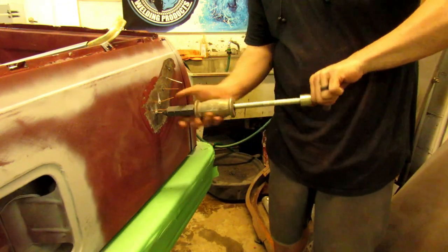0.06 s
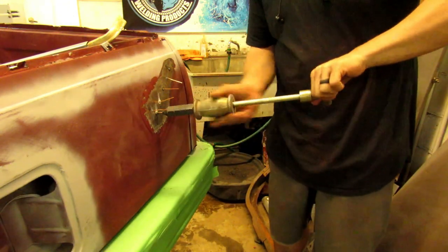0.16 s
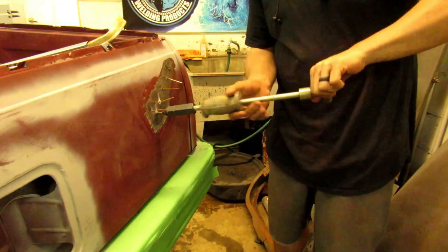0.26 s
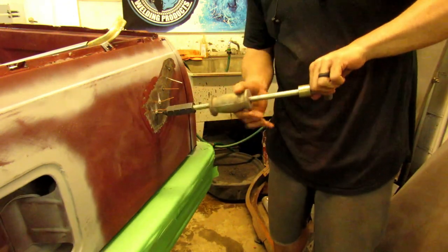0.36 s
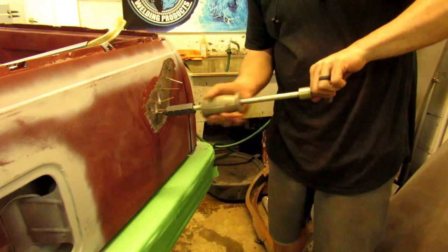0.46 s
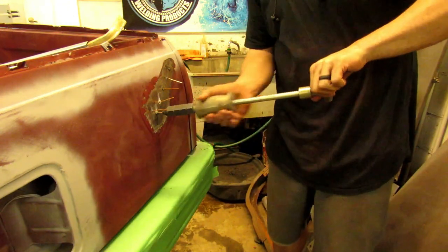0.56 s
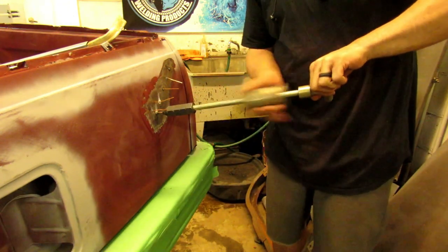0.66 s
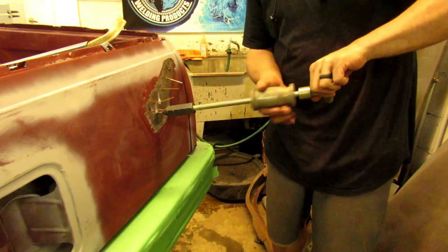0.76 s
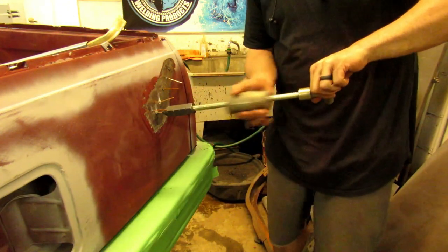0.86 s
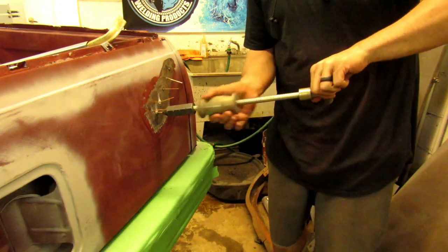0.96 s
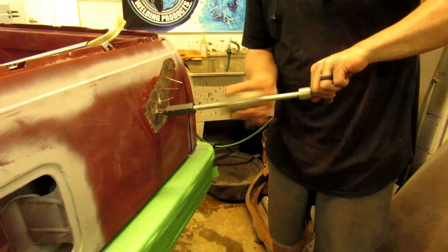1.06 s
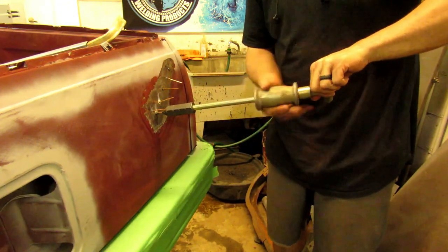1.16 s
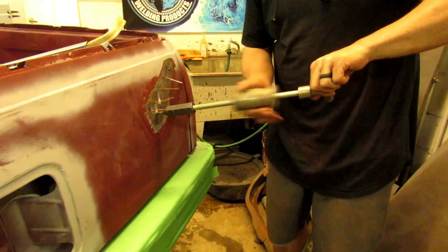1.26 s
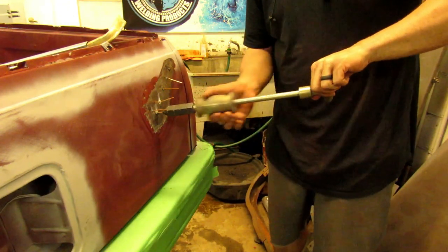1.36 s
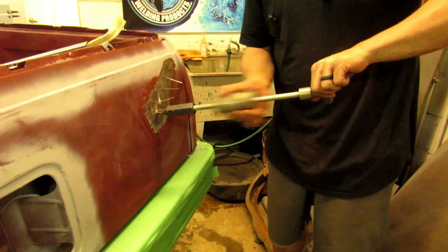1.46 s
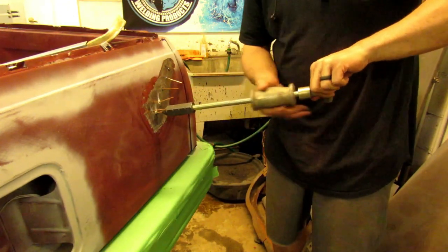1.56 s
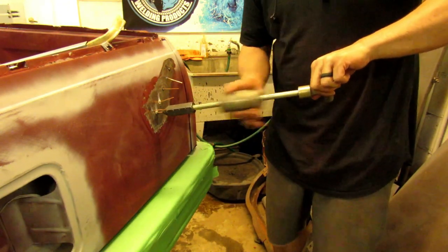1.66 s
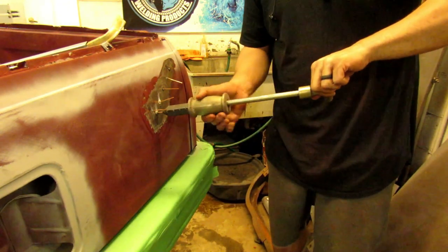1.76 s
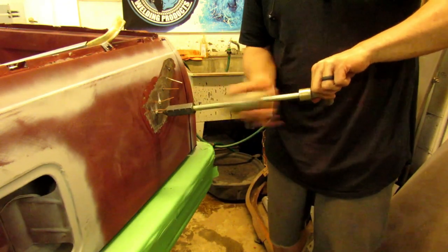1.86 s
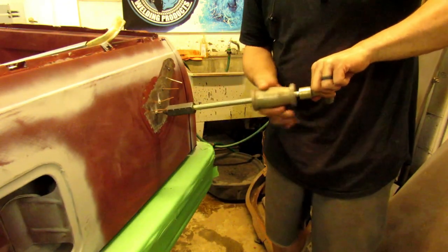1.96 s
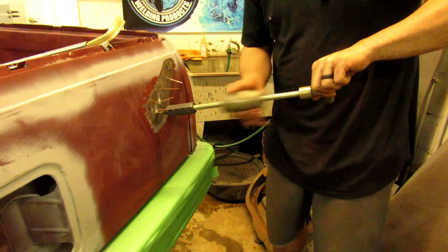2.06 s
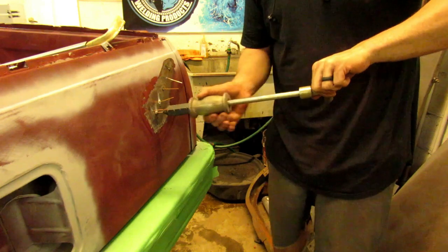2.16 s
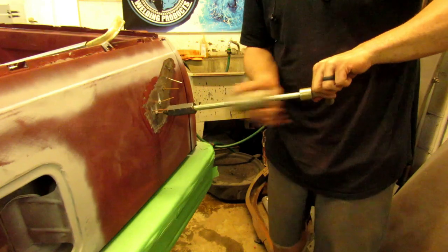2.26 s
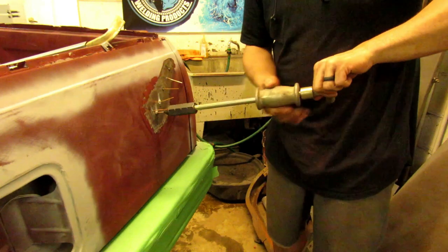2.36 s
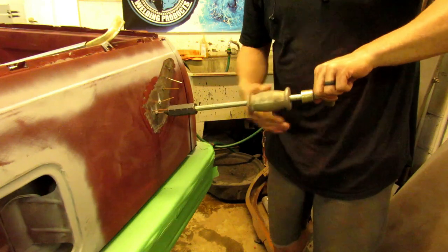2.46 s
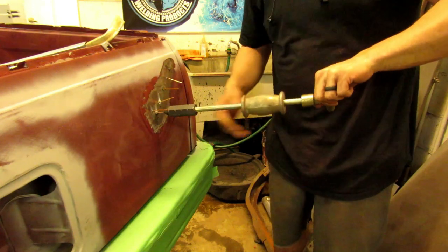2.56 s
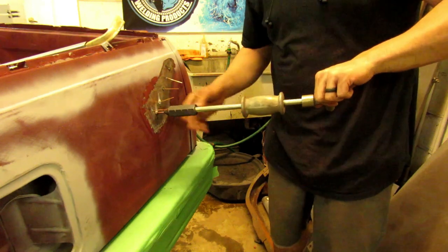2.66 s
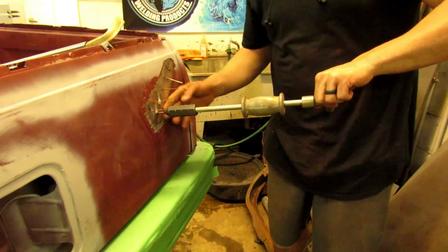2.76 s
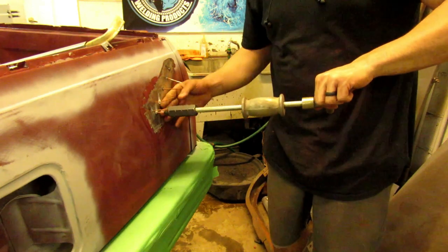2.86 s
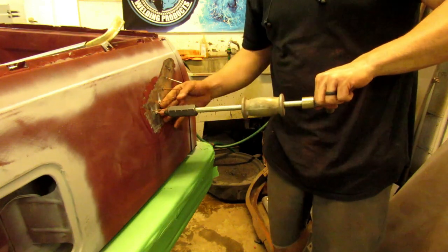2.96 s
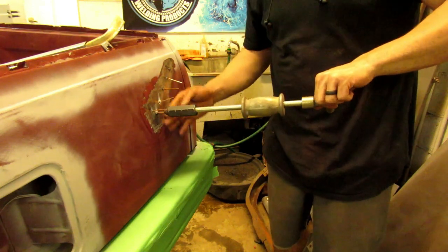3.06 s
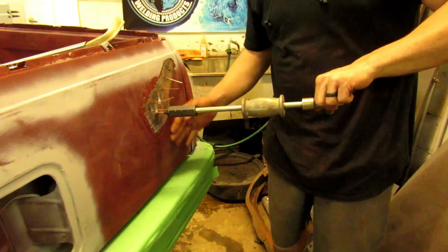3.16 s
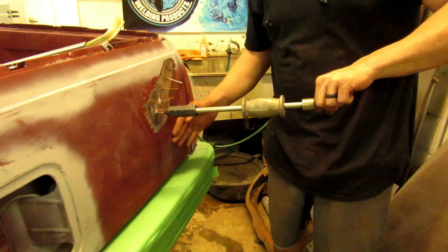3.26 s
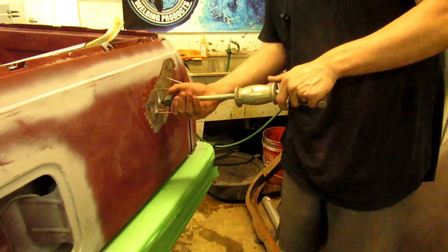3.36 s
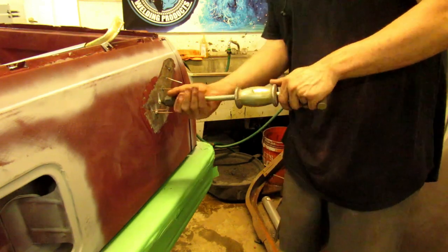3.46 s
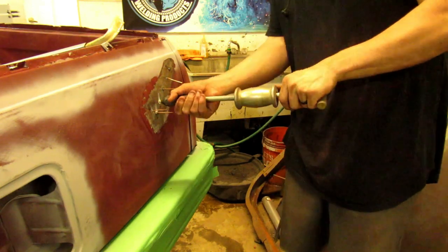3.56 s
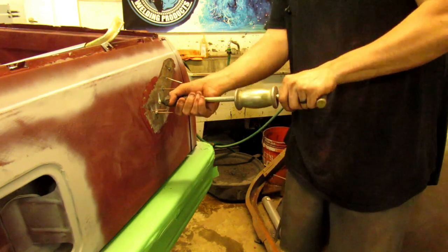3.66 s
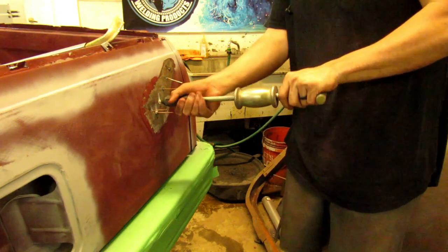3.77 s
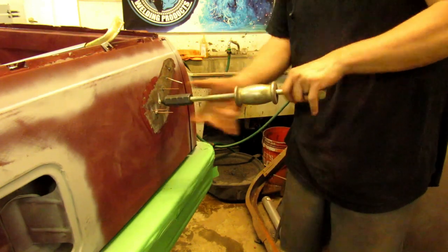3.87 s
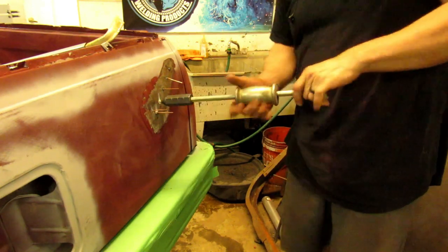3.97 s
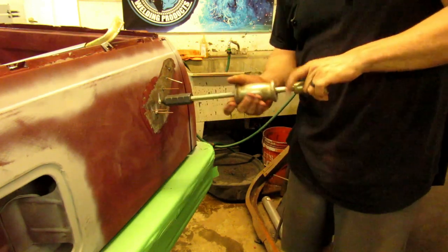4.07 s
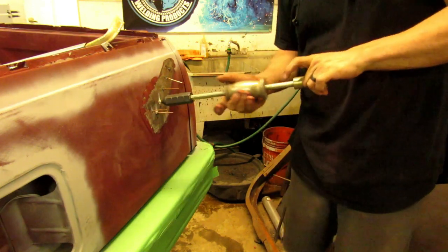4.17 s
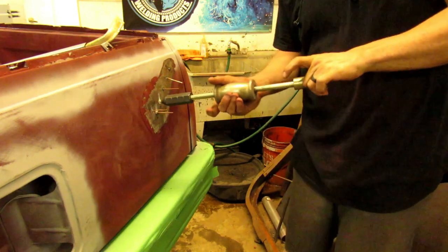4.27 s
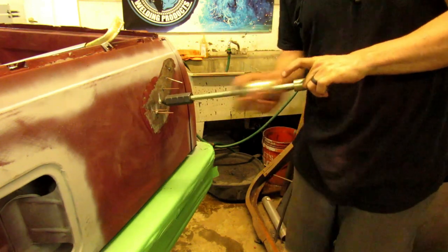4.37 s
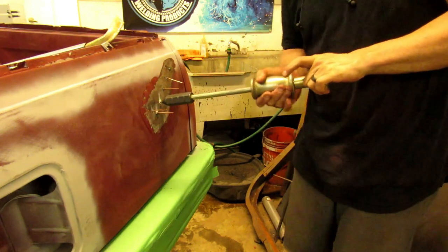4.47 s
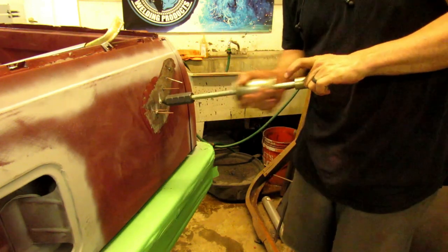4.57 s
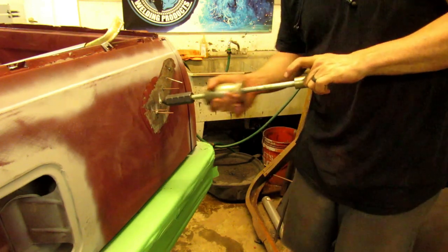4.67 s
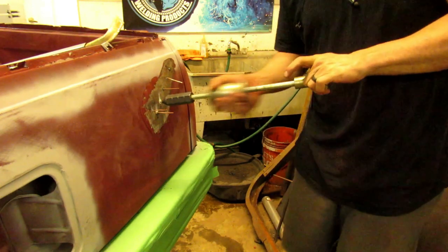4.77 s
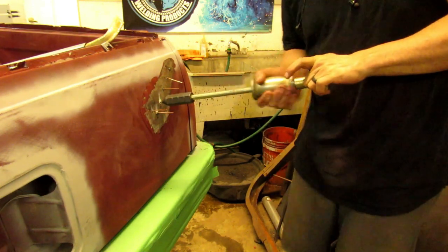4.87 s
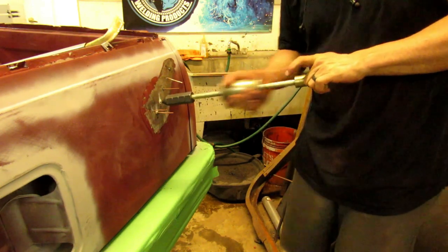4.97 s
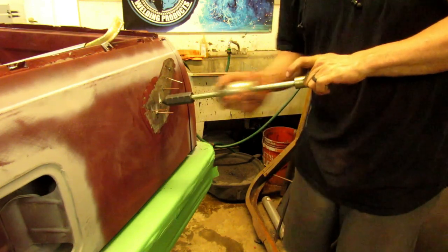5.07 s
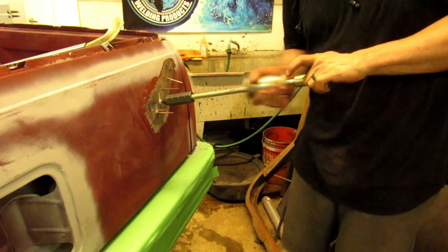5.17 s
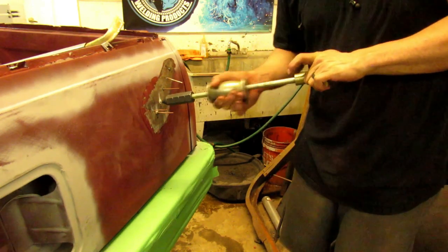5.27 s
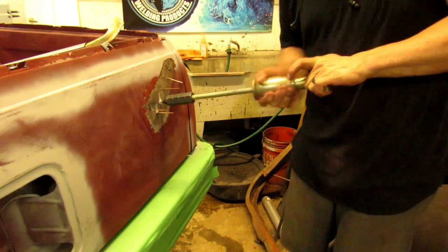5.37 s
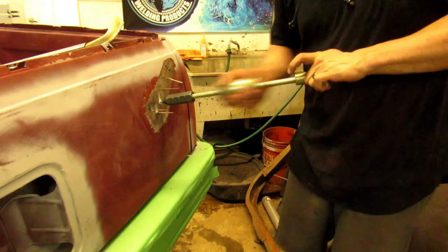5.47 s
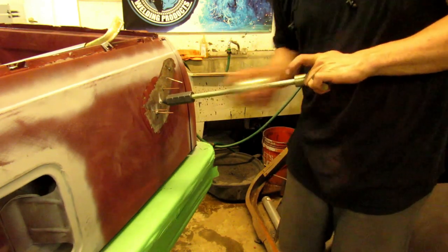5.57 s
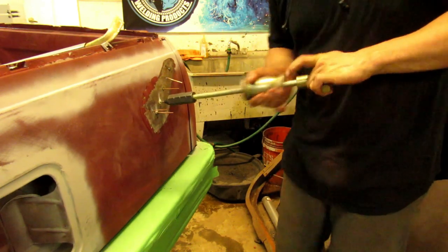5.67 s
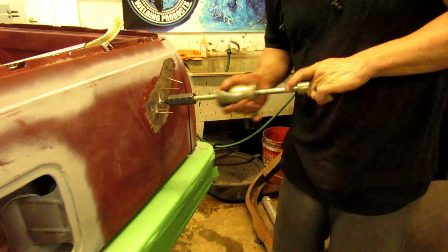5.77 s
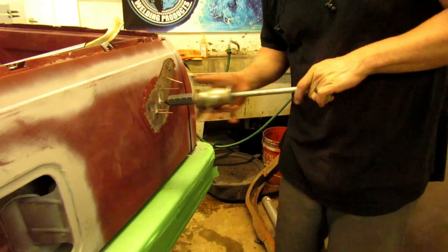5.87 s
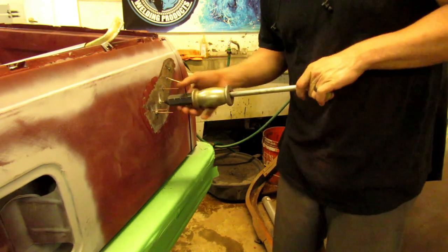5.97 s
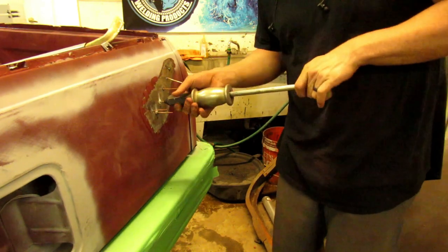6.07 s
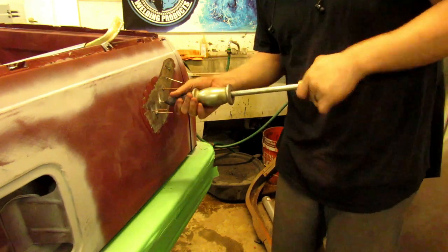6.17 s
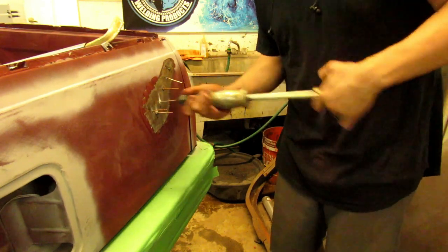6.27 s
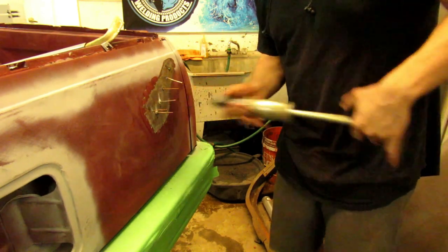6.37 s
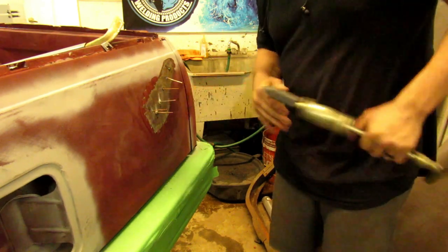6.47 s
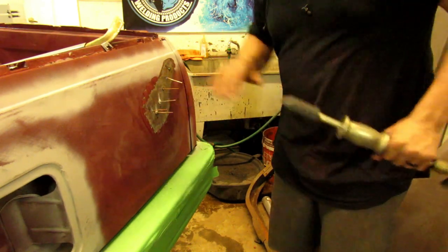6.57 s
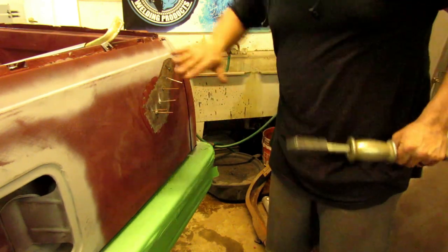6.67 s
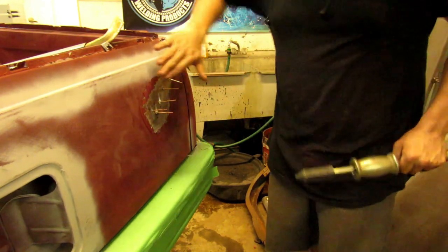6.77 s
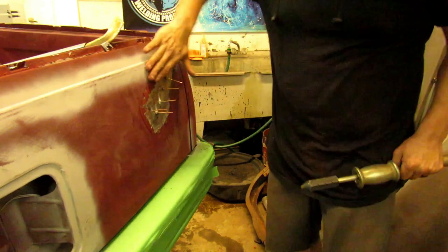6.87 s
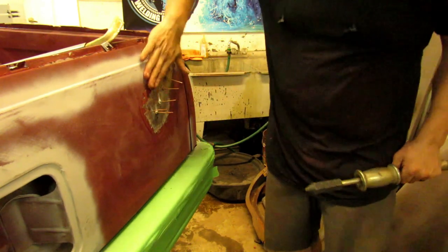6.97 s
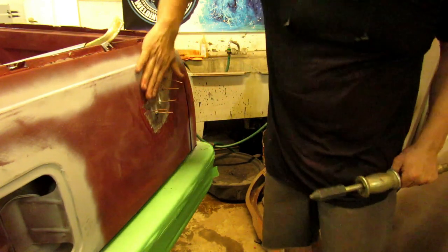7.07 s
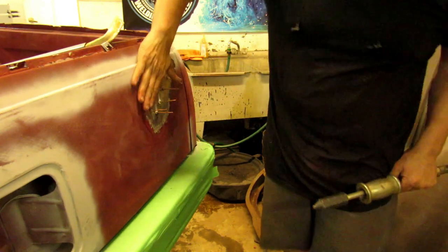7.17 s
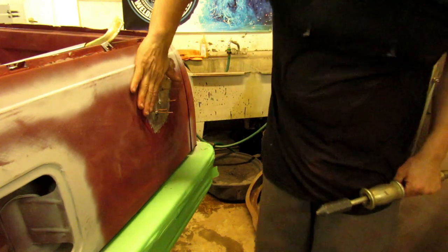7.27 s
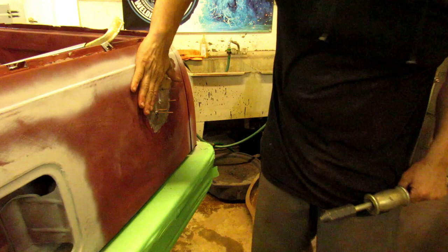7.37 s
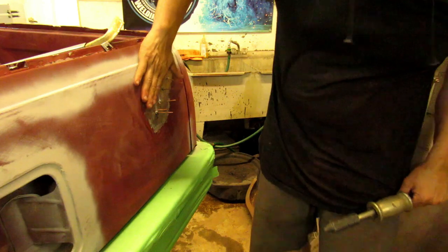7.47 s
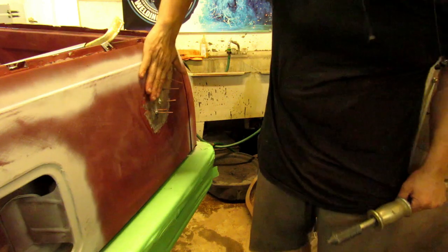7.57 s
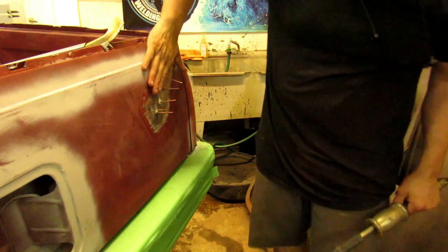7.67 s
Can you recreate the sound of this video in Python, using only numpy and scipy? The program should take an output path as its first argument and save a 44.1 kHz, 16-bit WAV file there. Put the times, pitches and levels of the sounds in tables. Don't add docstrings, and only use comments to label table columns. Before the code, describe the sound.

In a reverberant workshop, a sliding steel weight scrapes and ticks along its rod, then slams five times at a steady pace, each crack exciting a low, hollow car panel boom. Quiet knocks and hand rubs follow while the tool is moved. Five more slams come, the last ones quicker. The clamp releases with a small springy rattle, then a palm strokes the paint. Close small stereo camera microphone, clipping slightly on the hardest blows.

```python
import sys
import numpy as np
from scipy import signal
from scipy.fft import rfft, irfft, next_fast_len
from scipy.io import wavfile
from scipy.ndimage import uniform_filter1d

SR = 44100
rng = np.random.default_rng(int(sys.argv[2]) if len(sys.argv) > 2 else 0)


def store_wav(level_fs):
    pcm = np.round(np.clip(np.atleast_2d(level_fs), -1, 1) * 32767)
    wavfile.write(sys.argv[1], SR, pcm.T.astype(np.int16))


def ratio_of_db(decibels):
    return 10 ** (np.asarray(decibels, float) / 20)


N = 340011
RECLAMP_S = 3.0

# (time [s], pull on the sheet [dB], crack [dB], rod ring [dB], low boom [dB])
SLAMS = [
    (0.6592, -11, -2.5, -9.5, -14.5),
    (1.083, -9.5, 0.5, -10, -11),
    (1.4934, -9.5, 1.5, -21.5, -10.5),
    (1.8747, -8.5, 1, -22.5, -9.5),
    (2.2679, -10.5, 1, -29, -9),
    (4.3979, -9.5, 1, -8, -10),
    (4.859, -14, -7.5, -13, -11),
    (5.1304, -10, -4, -10, -12),
    (5.3715, -9, -4, -7, -10),
    (5.5981, -7, 1.5, -21.5, -15),
]
SNAP_LEVELS = [6, -5, -6.5, -4.5, -7, 0, -9.5, -7.5, -8.5, -9]
# (time [s], crack [dB], rod ring [dB], low boom [dB], upper boom [dB])
TICKS = [(0.214, -46, -39, -29, -27), (0.258, -22, -29.5, -29, -30.5), (0.2741, -17.5, -27, -33.5, -19),
         (0.5, -25.5, -27.5, -19.5, -19.5), (0.522, -13, -27, -11, -17), (1.012, -19.5, -31.5, -40.5, -37),
         (1.047, -25, -28.5, -35.5, -33), (1.4075, -29.5, -40, -29.5, -37),
         (1.709, -31.5, -32, -22.5, -19.5), (1.8007, -22.5, -49.5, -29, -44.5),
         (2.1072, -26.5, -22.5, -38, -25), (2.125, -14.5, -25, -16.5, -20.5), (5.884, -26, -24, -18, -29.5)]
# (time [s], low boom [dB], upper boom [dB], sheet clang
# [dB])
KNOCKS = [(3.257, -25, -38.5, -35.5), (3.4453, -19.5, -41.5, -33), (3.473, -25.5, -35, -38),
          (3.9226, -26.5, -38.5, -38.5), (4.099, -30, -27.5, -34), (4.3002, -28.5, -34.5, -38.5),
          (4.3203, -26.5, -28.5, -47.5), (6.2735, -43, -23, -31), (6.285, -50.5, -37, -39),
          (6.5074, -72, -53, -55.5), (6.8644, -49.5, -71, -59)]
STUD_BOOM = [0.5, 2.5]
STUD_ROD_TOP = [0, -12]
# (frequency [Hz], level [dB])
CRACK_COLOUR = [(880, -17), (1600, -2), (3000, -1), (6180, -3.5), (9370, -7), (13100, -12.5), (15100, -18),
                (16000, -36)]
# (frequency [Hz], level [dB])
SNAP_NOTES = [(3300, -8), (4400, -5), (7600, -10.5), (10200, -7.5), (12000, -12.5)]
# (frequency [Hz], level [dB], time to fade by 60 dB [s])
ROD_NOTES = [(2110, -8.5, .1), (2280, -3.5, .1), (2630, -8, 0.033), (2720, -2.5, 0.011),
             (3240, -12.5, 0.014), (3780, -14, .02), (4700, -19, 0.02), (5560, -19.5, 0.11),
             (6680, -12.5, .1), (7400, -13.5, 0.046), (7500, -23, .1), (10000, -25, .1), (10230, -11, .1),
             (12900, -31, 0.02)]
# (frequency [Hz], level [dB], time to fade by 60 dB [s])
PANEL_NOTES = [(91, -30, .3), (130, -15.5, .3), (153, -6, .3), (196, -19.5, .3), (191.4, -3, .3),
               (215, -9, 0.38), (225, -3, 0.22), (244, 10, .3), (294, 0, 0.045), (285, -5.5, 0.16),
               (314, -4, 0.43), (336, -1, 0.18), (373.5, 3, .3), (390, -3.5, 0.54), (432, 3.5, 0.25),
               (456.5, 4, .3), (543, -5.5, 0.25), (483, -2.5, .3), (591, -7.5, 0.27), (533, -13, 0.51),
               (795, -6, 0.27), (881, 4, 0.021), (884, -11.5, 0.45), (980, -17.5, 0.45), (1130, -9.5, 0.38),
               (1091, -11, 0.45), (1100, -15.5, 0.2), (1140, -15.5, 0.064), (1390, -11.5, 0.096),
               (1530, -4.5, .15)]
# (frequency [Hz], longest fade time [s])
LONGEST_FADE = [(200, .17), (500, .14), (900, .09), (1500, .07), (2600, .028), (10000, .035)]
# (frequency [Hz], level [dB])
SHEET_COLOUR = [(290, -32), (500, 3.5), (688, -18.5), (1080, -1.5), (1770, -4), (4800, -21.5),
                (5390, -26.5), (6420, -12.5), (12700, -40.5), (15100, -46.5), (16000, -87.5)]
# (frequency [Hz], fade time [s])
SHEET_FADE = [(100, 0.13), (400, 0.96), (1500, 0.39), (4000, 0.017), (12000, 0.02)]
# (frequency [Hz], level [dB])
CRUNCH_COLOUR = [(250, -28.5), (500, 4), (700, -1.5), (1000, 9), (1700, -4), (2600, -3.5), (4000, -12.5),
                 (9000, -27.5), (15000, -33)]
# (frequency [Hz], level [dB])
THUD_COLOUR = [(40, -37.5), (100, -10.5), (240, 0.5), (330, -0.5), (450, -2), (580, -8), (700, -20.5),
               (2000, -48.5)]
# (time [s], frequency [Hz], level [dB], rise [s])
SINGLE_PANEL_NOTES = [(0.167, 190.3, -19, 0.013), (0.274, 211, -15, 0.003), (0.3, 1091, -23, 0.0089),
                      (.505, 543.5, -16.5, 0.01), (2.97, 403.7, -48, 0.047), (3.259, 481, -29, 0.0011),
                      (4.112, 1118, -22.5, 0.013), (4.201, 596, -32, 0.0091), (4.4, 215, -13, 0.0026),
                      (6.283, 432, -30, 0.0088), (6.283, 479.3, -21, 0.014), (6.51, 421, -54.5, 0.0038),
                      (6.512, 480, -45.5, 0.0057), (6.601, 462, -56.5, 0.0042), (6.777, 466, -51.5, .003)]
CLINK_TIMES = [.213, .216, .257, .257, .257, .257, .273, .275, .4998, .4998, .4998, .522, .524, .524, .524,
               .6608, 1.412, 1.709, 1.722, 2.106, 2.124, 2.125, 2.125, 2.155]
LATE_CLINK_TIMES = [3.445, 4.096, 4.098, 4.299, 4.299, 4.399, 4.3985, 4.404, 4.865, 5.132, 5.373, 5.599,
                    5.884, 5.885, 5.89, 5.9, 6.263, 6.275]
# (frequency [Hz], level [dB], fade time [s])
CLINK_NOTES = [(3580, -42, .06), (4800, -46, .06), (4850, -26, 0.078), (10300, -37, .1), (2850, -32.5, .1),
               (8000, -41.5, 0.09), (6600, -29, .08), (10400, -38, .08), (2930, -25.5, .15),
               (1865, -27, 0.16), (3880, -28.5, 0.12), (1870, -19, .03), (2950, -18.5, 0.048),
               (6600, -15.5, .016), (7300, -23, .014), (2800, -7.5, .025), (10300, -44, .07),
               (2640, -30.5, .1), (2800, -30.5, .06), (2600, -30, .04), (2450, -28, .03),
               (3370, -28.5, 0.018), (10100, -32.5, .03), (2620, -28, .03), (9480, -50, 0.08),
               (1776, -29, .04), (5190, -45.5, .025), (1790, -40, .03), (5300, -49.5, .03),
               (10300, -18, .03), (2862, -6, 0.011), (2640, -13, 0.071), (2650, -12.5, .04),
               (2640, -18, .06), (2680, -18.5, .05), (2640, -22.5, .05), (6500, -24.5, .016),
               (2620, -17.5, 0.069), (5200, -38, .04), (2800, -29.5, .1), (2860, -42, .05),
               (3150, -39.5, .05)]
# (frequency [Hz], climb [Hz/s], level over low boom [dB], swell [s])
TWANGS = [
    [(194, 2900, -3, .017), (432.8, 0, -5, 0.0064), (1121, 0, -14, 0.014)],
    [(211, 303, -0.5, 0.012), (420, -0.5, -1, 0.0081), (246.5, -1.5, -8, 0.044)],
]
# (time [s], peak level [dB], frequency [Hz])
BOUNCES = [(6.288, -10.5, 451), (6.304, -18.5, 461), (6.32, -17, 445), (6.34, -17.5, 468.5),
           (6.362, -26, 502), (6.389, -26.5, 470), (6.404, -26, 480), (6.431, -33.5, 437),
           (6.456, -38, 450), (6.511, -31.5, 460), (6.539, -36, 471), (6.56, -38, 434.3),
           (6.602, -44.5, 480), (6.642, -48, 465), (6.662, -47, 463), (6.695, -49, 490),
           (6.734, -47.5, 439), (6.775, -42, 443), (6.812, -54.5, 482)]
PUSH_TIMES = [.33, .543, .54, .565, .608, .611, .63, 3.85, 3.923, 3.924, 4.096, 4.312, 4.335, 4.352, 4.36,
              4.385, 4.385, 4.386, 6.205, 6.285, 6.298]
# (frequency [Hz], peak level [dB], swell [s])
PUSH_NOTES = [(202, -22, .015), (228, -13.5, 0.0052), (6180, -35.5, 0.0064), (555, -17.5, .011),
              (3500, -35, 0.0062), (195, -12.5, 0.0081), (2300, -28, .01), (260, -30.5, .004),
              (298, -26.5, 0.0029), (950, -40, 0.005), (1000, -32.5, .004), (400, -25.5, .008),
              (450, -26.5, .006), (520, -23.5, 0.0076), (1900, -33, .005), (3090, -29.5, .005),
              (4480, -35.5, .004), (300, -15, .0032), (1120, -44, 0.0045), (1500, -41.5, .004),
              (980, -37, 0.0057)]
# (start [s], end [s], start frequency [Hz], end frequency [Hz])
SLIDES = [(.505, .66, 1900, 3000), (.505, .66, 3000, 4100), (.55, .655, 4600, 5700),
          (.6, .66, 10300, 10300), (4.3, 4.398, 1200, 2800), (4.335, 4.398, 3300, 4600),
          (3.76, 3.82, 5000, 10000), (1.708, 1.75, 2600, 2750), (2.105, 2.165, 2500, 2800),
          (4.35, 4.398, 5200, 6600), (4.35, 4.398, 7600, 8300), (4.37, 4.398, 9900, 10400),
          (.62, .658, 5350, 5600)]
SLIDE_LEVELS = [-27, -27, -27, -38.5, -30, -33, -62, -29.5, -26, -38, -40.5, -41.5, -24]
# (start [s], length [s], panel shake [dB], weight scrape [dB])
MOVES = [(0, 0.092, -30, -43), (.1, 0.13, -35.5, -45.5), (.262, 0.027, -19, -30), (.3, .18, -30.5, -42.5),
         (.505, 0.13, -19, -31.5), (.9, 0.17, -36, -50.5), (1.35, 0.064, -34.5, -45),
         (1.68, .18, -42, -43.5), (2.09, 0.08, -36, -36), (2.16, 0.042, -28, -39.5),
         (3.27, .13, -33, -50.5), (3.445, 0.064, -26.5, -56.5), (3.52, .36, -38, -54),
         (3.928, 0.17, -31, -62.5), (4.1, 0.092, -29, -68), (4.19, 0.097, -33, -54.5),
         (4.31, 0.027, -23, -56.5), (4.36, .036, -16.5, -39), (5.88, .1, -25, -35),
         (5.99, .28, -36.5, -58.5)]
# (start [s], length [s], level [dB])
STROKES = [(3.04, .06, -73.5), (3.26, 0.22, -76), (3.43, 0.031, -58), (3.49, 0.21, -62.5),
           (3.76, 0.042, -53.5), (3.84, 0.15, -56.5), (4.05, 0.34, -61.5), (6.12, .08, -80),
           (6.22, 0.055, -54), (6.3, 0.11, -70), (6.87, 0.116, -67.5), (7.0, 0.21, -64),
           (7.22, 0.13, -71.5), (7.38, 0.36, -63.5)]
# (frequency [Hz], level [dB])
SKIN_COLOUR = [(350, -44), (600, -27.5), (1430, -3), (1980, 5), (2610, -2.5), (11800, -4), (14700, -7),
               (16000, -33.5)]
# (frequency [Hz], level [dB])
ROOM_COLOUR = [(60, 3.5), (300, 5), (1000, -1), (4000, 1.5), (14000, -4)]
# (frequency [Hz], fade time [s])
ROOM_FADE = [(100, 0.87), (400, 0.89), (1200, 1.16), (3000, 1.083), (7000, 0.97), (14000, 0.5)]
# (frequency [Hz], rms level [dB])
LAMP_NOTES = [(118.4, -74.5), (242.2, -71.5), (360.7, -78), (1319, -88), (1680, -83), (1798, -87.5),
              (2040, -97), (2159, -87.5)]
# (frequency [Hz], level [dB])
AIR_COLOUR = [(15, -41), (25, -5), (217, 2.5), (317, -6), (405, 2), (659, -18), (1070, -10), (3340, -29.5),
              (3820, -21.5), (4740, -32.5), (11300, -34), (14000, -40), (16000, -43.5)]
# (frequency [Hz], level [dB])
WIDTH = [(60, -8), (110, -19.5), (200, -18), (380, -16.5), (700, -14), (1290, -13.5), (2380, -18.5),
         (4400, -14.5), (8120, -9), (15000, -6)]
# (frequency [Hz], level [dB])
NEAR_WIDTH = [(2000, -1.5), (5000, -1), (10000, -1.5)]
# (frequency [Hz], level [dB])
BALANCE = [(60, -1.5), (110, -1), (200, -0.5), (380, 0), (700, 2.5), (1290, 2), (2380, 0), (4400, 0),
           (8120, 1), (15000, 0.5)]


def over_hz(table, hz):
    f, v = np.transpose(table)
    return np.interp(np.log(np.maximum(hz, 1)), np.log(f), v)


def colour(x, table):
    n = x.shape[-1]
    size = next_fast_len(n)
    gain = ratio_of_db(over_hz(table, np.fft.rfftfreq(size, 1 / SR)))
    gain = gain / np.sqrt(np.mean(gain ** 2))
    return irfft(rfft(x, size) * gain, size)[..., :n]


def ring(x, hz, t60):
    r = np.exp(-np.log(1000) / (t60 * SR))
    w = 2 * np.pi * hz / SR
    return signal.lfilter([np.sin(w)], [1, -2 * r * np.cos(w), r * r], x)


def fading_noise(table, t60s, rise_s, channels):
    t = np.arange(65536) / SR
    hz = np.fft.rfftfreq(len(t), 1 / SR)
    noise = rfft(colour(rng.standard_normal((channels, len(t))), table))
    out = 0
    for centre in 45 * 2 ** np.arange(0, 9, .5):
        octaves = np.log2(np.maximum(hz, 1) / centre)
        band = np.cos(np.pi * np.clip(octaves, -.5, .5)) ** 2
        out = out + irfft(noise * band, len(t)) * ratio_of_db(-60 * t / over_hz(t60s, centre))
    out = out * (1 - np.exp(-t / rise_s))
    return out / np.sqrt(np.sum(out[0] ** 2))


def grit(rate, spread_db, size=N):
    clicks = (rng.random(size) < rate / SR) * rng.standard_normal(size)
    x = clicks * ratio_of_db(spread_db * rng.exponential(size=size))
    return x / np.std(x)


def hits():
    slams = [(s, crack, rod, low, pull + STUD_BOOM[s > RECLAMP_S], pull) for s, pull, crack, rod, low in SLAMS]
    ticks = [(*row, row[-1] - 8.5) for row in TICKS]
    knocks = [(s, clang - 14.5, clang - 18.5, low, upper, clang) for s, low, upper, clang in KNOCKS]
    return np.array(slams + ticks + knocks)


def strikes(size, lag_s=0.):
    travel_s = .0007
    out = np.zeros(N)
    np.add.at(out, ((hits()[:, 0] + travel_s + lag_s) * SR).astype(int), size)
    return out


def burst(db, rise_s, quick_s, share, slow_s, source, table):
    t = np.arange(8192) / SR
    fall = np.exp(-t / quick_s) + share * np.exp(-t / slow_s)
    shape = (1 - np.exp(-t / rise_s)) * fall
    return signal.oaconvolve(strikes(ratio_of_db(db)), shape)[:N] * colour(source, table)


def body(modes, blow_db, shake, lag_s):
    scatter_db = 2.5
    chance = rng.standard_normal((len(hits()), len(modes)))
    place = rng.uniform(-1.013, 1, len(modes))
    out = 0
    for k, (hz, db, t60) in enumerate(modes):
        size = ratio_of_db(blow_db(hz) + scatter_db * chance[:, k]) * np.sign(place[k])
        push = strikes(size, lag_s * abs(place[k])) + shake
        out = out + ratio_of_db(db) * ring(push, hz, min(t60, over_hz(LONGEST_FADE, hz)))
    return out


def swells(rows, column, rise_s, fall_s):
    t = np.arange(N) / SR
    power = 0
    for row in np.array(rows):
        before = np.clip(row[0] - t, 0, None)
        after = np.clip(t - row[0] - row[1], 0, None)
        power = power + (ratio_of_db(row[column]) * np.exp(-before / rise_s - after / fall_s)) ** 2
    return np.sqrt(power)


def crack():
    return burst(hits()[:, 1] - 4.5, .0001, .00041, .26, .0091, rng.standard_normal(N), CRACK_COLOUR)


def snap():
    size = np.zeros(len(hits()))
    size[:len(SLAMS)] = ratio_of_db(SNAP_LEVELS)
    push = strikes(size)
    return sum(ratio_of_db(db) * ring(push, hz, .006) for hz, db in SNAP_NOTES)


def crunch():
    return burst(hits()[:, 5] - 6, .005, .019, .18, .092, grit(1500, .84), CRUNCH_COLOUR)


def thud():
    boom_db = (hits()[:, 3] + hits()[:, 4]) / 2
    return burst(boom_db - 7.5, .002, .049, .25, .1, rng.standard_normal(N), THUD_COLOUR)


def rod(scrape):
    when, _, rod_db, *_ = hits().T
    top_db = np.where(when > RECLAMP_S, STUD_ROD_TOP[1], STUD_ROD_TOP[0])
    return body(ROD_NOTES, lambda hz: rod_db - 5 + (hz > 6000) * top_db, scrape * ratio_of_db(-34.5), .00076)


def panel(shake):
    *_, low_db, upper_db, clang_db = hits().T

    def blow_db(hz):
        part = low_db if hz < 360 else upper_db if hz < 700 else clang_db + 1.5
        return part - 14

    return body(PANEL_NOTES, blow_db, shake * ratio_of_db(-45), .004)


def sheet(shake):
    tug = strikes(ratio_of_db(hits()[:, 5] + 16.5)) + shake * ratio_of_db(-20.5)
    return signal.fftconvolve(tug, fading_noise(SHEET_COLOUR, SHEET_FADE, .001, channels=1)[0])[:N]


def lone_notes():
    stretch = 2.5
    rows = [(s, hz, db, stretch * over_hz(LONGEST_FADE, hz), rise_s) for s, hz, db, rise_s in SINGLE_PANEL_NOTES]
    rows += [(s + .0025, 445, pull - 11, .2, .003) for s, pull, *_ in SLAMS if s > RECLAMP_S]
    rows += [(s, 232, low - 9.5, .18, .006) for s, *_, low in SLAMS]
    rows += [(s, 191.1, low - 5.5, .21, .008) for s, *_, low in SLAMS]
    clink_rise_s = .00014
    rows += [(s, *row, clink_rise_s) for s, row in zip(CLINK_TIMES + LATE_CLINK_TIMES, CLINK_NOTES)]
    out, t = np.zeros(N), np.arange(SR) / SR
    for s, hz, db, t60, rise_s in rows:
        wobble = 1 + 6 * uniform_filter1d(rng.standard_normal(SR), size=250 if hz < 1500 else 150)
        loudness = ratio_of_db(db - 60 * t / t60) * (1 - np.exp(-t / rise_s))
        tone = loudness * wobble * np.sin(2 * np.pi * hz * t)
        start = int(s * SR)
        out[start:start + SR] += tone[:N - start]
    return out


def twangs():
    rows = []
    for s, *_, low in SLAMS:
        rows += [(s, hz, low + db, swell_s, climb) for hz, climb, db, swell_s in TWANGS[s > RECLAMP_S]]
    rows += [(s - .004, hz, db - 6, .0067, 0) for s, db, hz in BOUNCES]
    rows += [(s, *row, 0) for s, row in zip(PUSH_TIMES, PUSH_NOTES)]
    out, t = np.zeros(N), np.arange(8192) / SR
    for s, hz, db, swell_s, climb in rows:
        age = t / swell_s
        rough = 1 + hz / 350 * uniform_filter1d(rng.standard_normal(len(t)), size=80)
        tone = np.sin(2 * np.pi * (hz + climb * t / 2) * t)
        start = int(s * SR)
        out[start:start + len(t)] += ratio_of_db(db) * rough * age * np.exp(1 - age) * tone
    return out


def slides():
    swell_db = 6
    out = np.zeros(N)
    for (start, end, from_hz, to_hz), db in zip(SLIDES, SLIDE_LEVELS):
        run = np.linspace(0, 1, int((end - start) * SR))
        turns = np.cumsum(from_hz + (to_hz - from_hz) * run) / SR
        rough = 8 * uniform_filter1d(grit(9000, 1.0, size=len(run)), size=55)
        first = int(start * SR)
        out[first:first + len(run)] += ratio_of_db(db - swell_db * (2 - run)) * rough * np.sin(2 * np.pi * turns)
    return out


def handling(column, rush_db):
    rush = [(s, 0, rush_db) for s, *_ in SLAMS if s < RECLAMP_S]
    return swells(MOVES, column, .0087, .013) + swells(rush, -1, .016, .00042)


def stroke():
    skin = colour(rng.standard_normal(N) + .15 * grit(800, 3.9), SKIN_COLOUR)
    return swells(STROKES, -1, .019, .03) * skin * ratio_of_db(-1.5)


def workshop_echo(spread, room):
    return signal.fftconvolve(spread[None], room, axes=1)[:, :N] * ratio_of_db(-8.5)


def lamp_hum():
    t = np.arange(N) / SR
    return sum(np.sqrt(2) * ratio_of_db(db) * np.sin(2 * np.pi * hz * t) for hz, db in LAMP_NOTES)


def workshop_air():
    return colour(rng.standard_normal((2, N)), AIR_COLOUR) * ratio_of_db(-64.5)


def stereo(near, echo, air, hum):
    hz = np.fft.rfftfreq(N, 1 / SR)
    mid = rfft(near + echo[0] + air[0] + hum)
    tool = rfft(ratio_of_db(4) * echo[1] + ratio_of_db(3) * np.roll(near, shift=20)) * ratio_of_db(over_hz(NEAR_WIDTH, hz))
    side = (tool + rfft(ratio_of_db(12) * air[1])) * ratio_of_db(over_hz(WIDTH, hz))
    lean = ratio_of_db(over_hz(BALANCE, hz) / 2)
    return irfft(np.array([(mid + side) * lean, (mid - side) / lean]), N)


def scene():
    shake = handling(-2, -19) * grit(900, 1.0)
    scrape = handling(-1, -37) * grit(7600, .94)
    clamp_rub = colour(shake, CRUNCH_COLOUR) * ratio_of_db(-20)
    weight_scrape = colour(scrape, CRACK_COLOUR) * ratio_of_db(-12)
    bang, click = crack(), snap()
    body_sound = crunch() + thud() + rod(scrape) + panel(shake) + sheet(shake)
    body_sound = body_sound + clamp_rub + weight_scrape + stroke() + slides()
    lone = lone_notes()
    room = fading_noise(ROOM_COLOUR, ROOM_FADE, .0035, channels=2)
    air = workshop_air()
    lone = lone + twangs()
    near = bang + click + body_sound + lone
    even_crack = colour(strikes(ratio_of_db(hits()[:, 1] + 8)), CRACK_COLOUR)
    spread = body_sound + .24 * click + .7 * lone + .51 * bang + even_crack
    return stereo(near, workshop_echo(spread, room), air, lamp_hum())


def roll_off(x):
    return signal.sosfilt(signal.butter(12, 16160, fs=SR, output="sos"), x)


def record(dry):
    x = signal.sosfilt(signal.butter(2, 70, "high", fs=SR, output="sos"), dry)
    x = signal.sosfilt(signal.butter(8, 15000, fs=SR, output="sos"), np.clip(x, -1, 1))
    return roll_off(np.clip(x, -1, 1))


dry = scene()
out = record(dry)
store_wav(out)
```